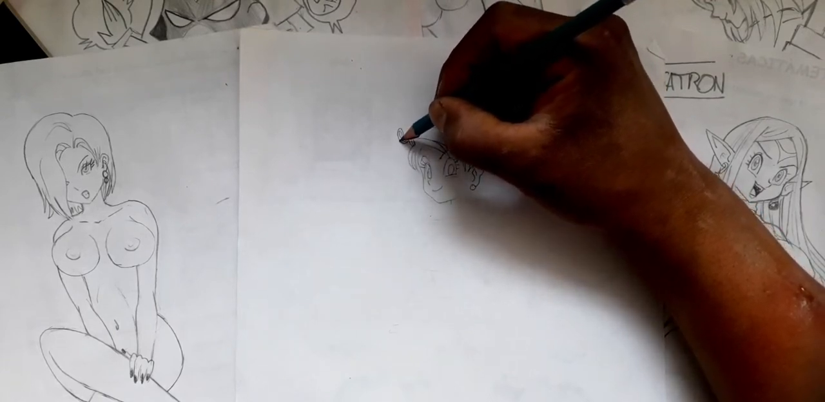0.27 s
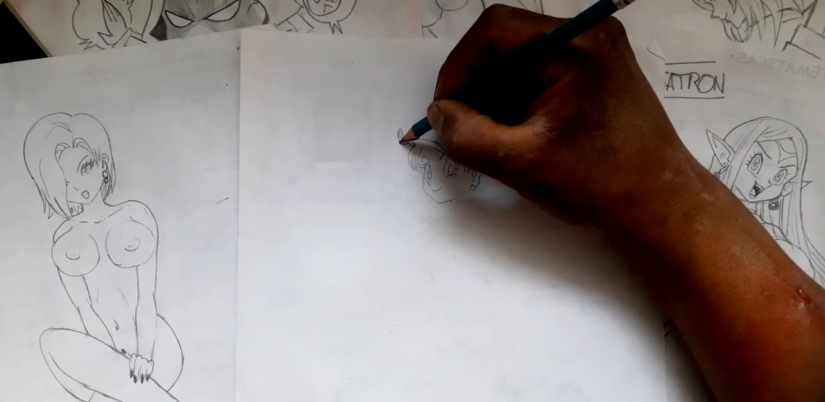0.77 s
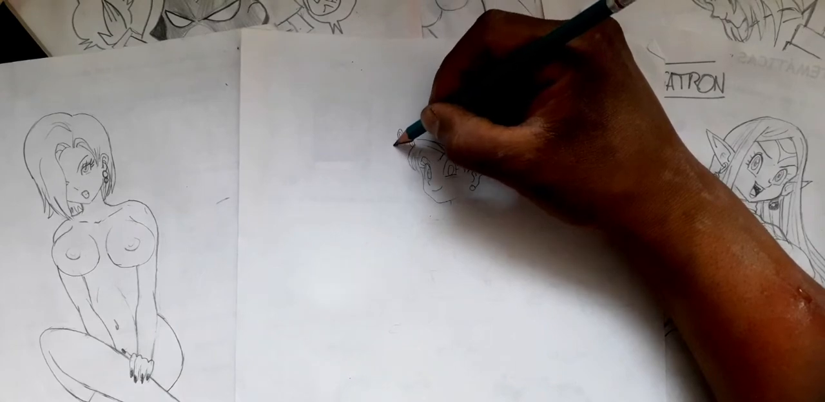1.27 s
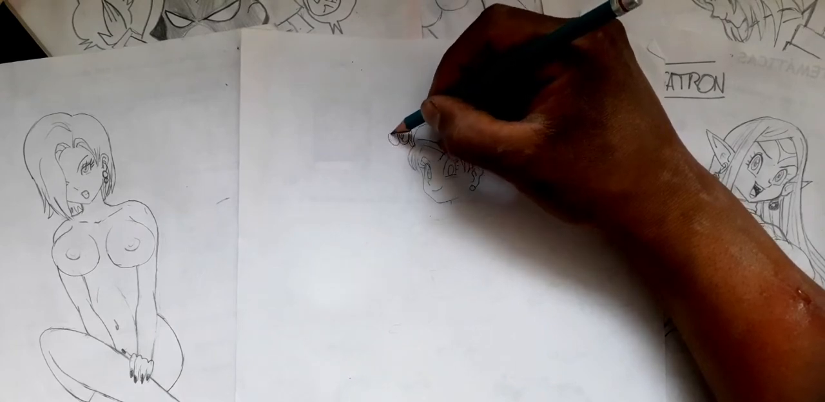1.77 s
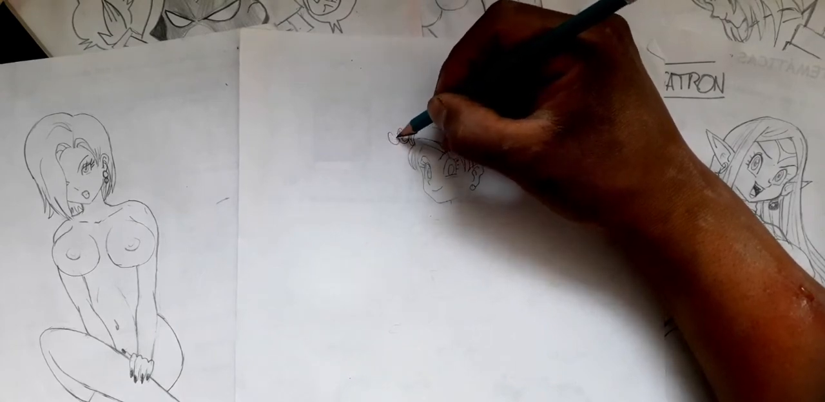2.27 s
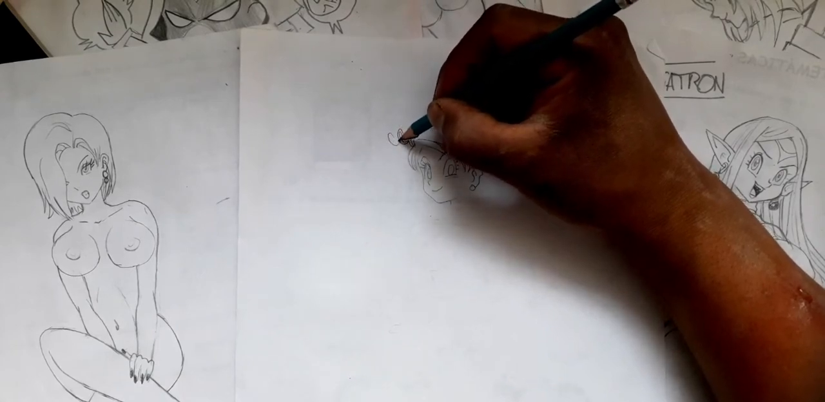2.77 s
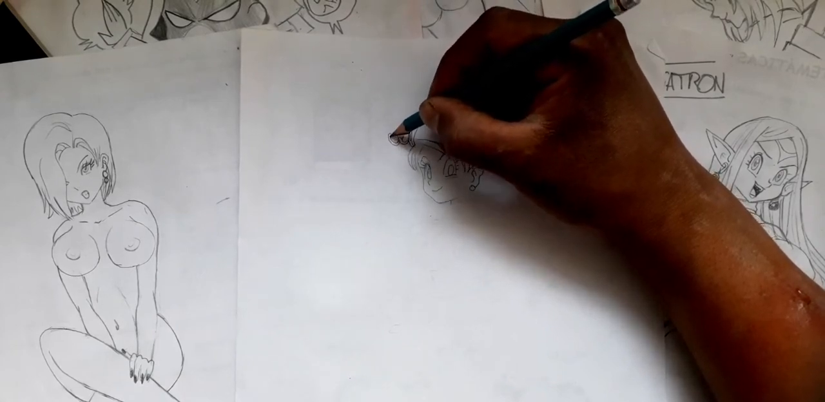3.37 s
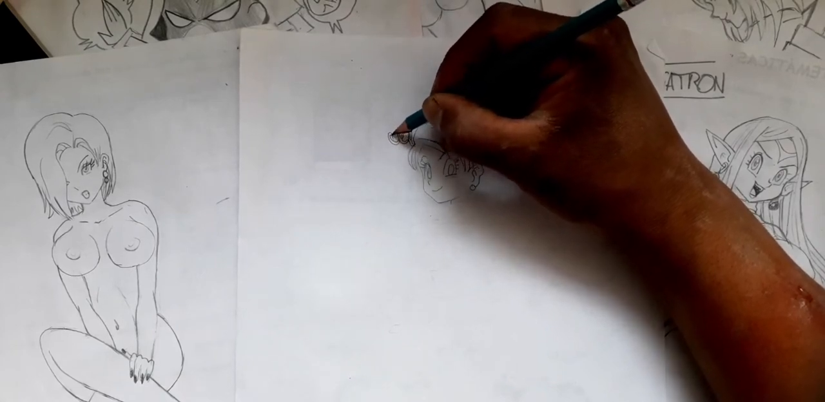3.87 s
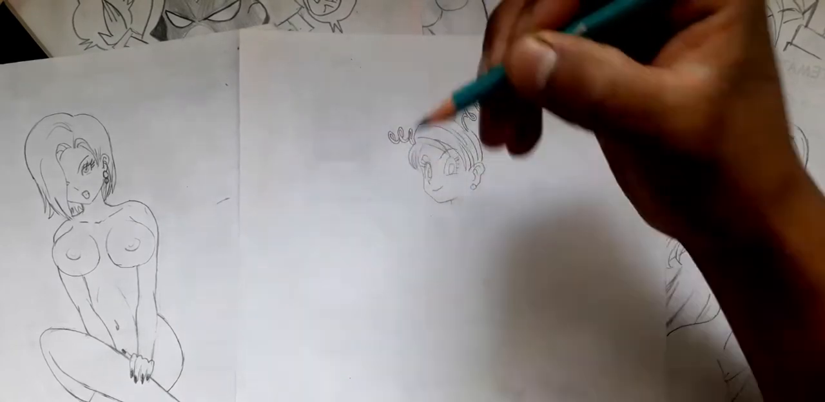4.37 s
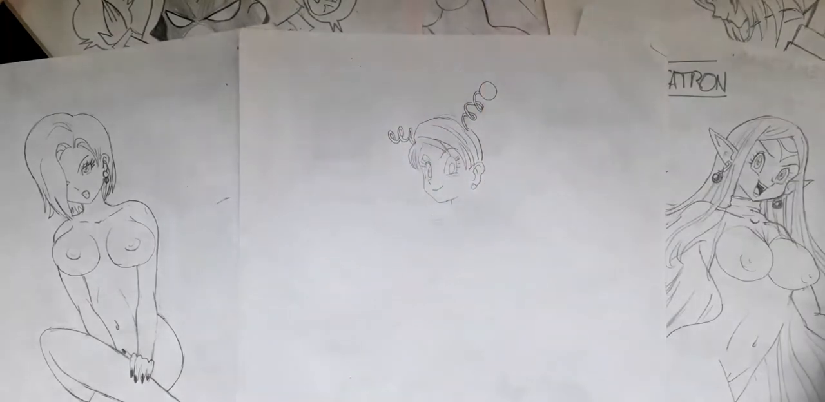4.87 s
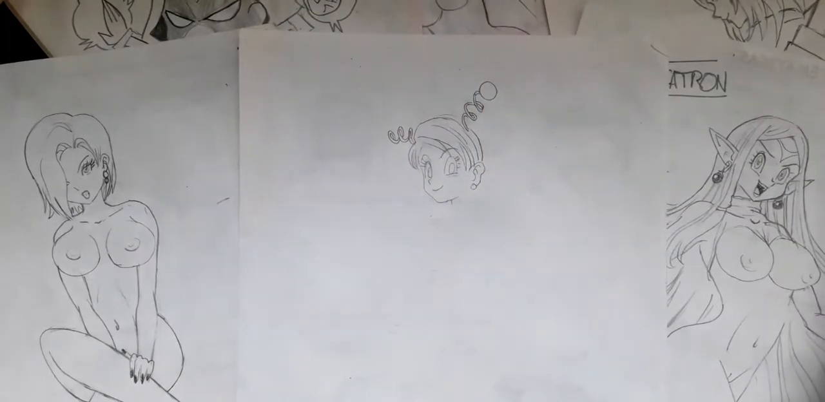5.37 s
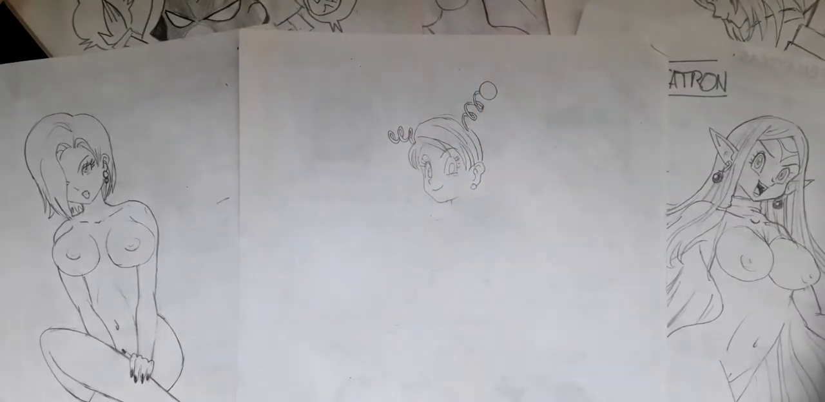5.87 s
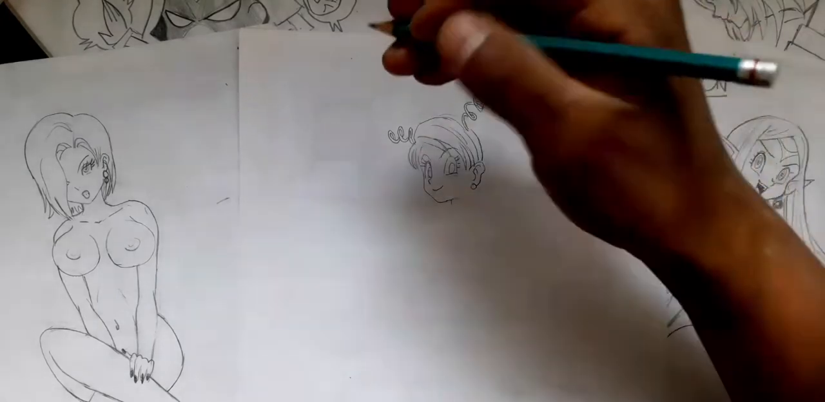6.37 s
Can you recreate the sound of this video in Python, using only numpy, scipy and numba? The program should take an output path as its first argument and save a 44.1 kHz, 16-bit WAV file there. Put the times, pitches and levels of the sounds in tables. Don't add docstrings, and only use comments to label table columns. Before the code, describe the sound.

Quiet sketching over low street rumble and hiss; an engine swells outside as the hand lifts, rustles, returns and knocks the desk.

```python
import sys
import numpy as np
from scipy import signal
from scipy.fft import rfft, irfft
from scipy.io import wavfile
from scipy.ndimage import uniform_filter1d
from numba import njit

SR = 44100
rng = np.random.default_rng(int(sys.argv[2]) if len(sys.argv) > 2 else 0)


def unload_wav(signal):
    wavfile.write(
        sys.argv[1],
        SR,
        np.round(np.clip(np.atleast_2d(signal).T, -1, 1) * 32767).astype(np.int16),
    )


def to_linear_factor(level_db):
    exponent = np.asarray(level_db, float) / 20
    return 10 ** exponent


N = 291809
T = np.arange(N) / SR

# f/Hz, width/Hz, level/dB
ROOM = [(73.5, 9, -6), (89.9, 11.1, 2), (108.6, 14.5, -8), (135.4, 11.8, 1), (157.1, 9.9, -2),
        (181.1, 11.3, -2), (211.6, 12.6, -2), (241, 17, -5), (269.7, 12, -12), (297, 18, -14.5),
        (348, 15, -11.5)]


def level(x, db):
    return x * to_linear_factor(db) / np.sqrt(np.mean(x ** 2))


@njit
def sweep(x, hz, width):
    y, band, low = np.empty(len(x)), 0., 0.
    for i in range(len(x)):
        g, damping = np.tan(np.pi * hz[i] / SR), width / hz[i]
        v = (band + g * (x[i] - low)) / (1 + g * (g + damping))
        band, low, y[i] = 2 * v - band, low + 2 * g * v, damping * v
    return y


def resonance(x, hz, width):
    return sweep(x, np.full(len(x), 1. * hz), 1. * width)


def steep(x, hz, width):
    return resonance(resonance(x, hz, width), hz, width)


def ring(x, modes):
    return sum((-1) ** k * to_linear_factor(db) * resonance(x, hz, width) for k, (hz, width, db) in enumerate(modes))


def walk(rate):
    hold = int(SR / rate)
    steps = np.repeat(rng.standard_normal(N // hold + 1), hold)
    return 0.91 * uniform_filter1d(uniform_filter1d(steps, hold), hold)[:N]


def coloured(points, lo_hz, hi_hz):
    f = np.fft.rfftfreq(N, 1 / SR) + 1e-3
    hz, db = np.transpose(points)
    gain = to_linear_factor(np.interp(np.log(f), np.log(hz), db))
    gain /= np.sqrt(np.sum(gain[(f > lo_hz) & (f < hi_hz)] ** 2) / len(f))
    return irfft(rfft(rng.standard_normal(N)) * gain, N)


def curve(table):
    t, value = np.transpose(table)
    return np.interp(T, t, value)


def swells(rows, signs=1):
    out = np.zeros(N)
    for k, (t, rise, fall, db) in enumerate(rows):
        span = slice(max(int((t - rise) * SR), 0), int((t + fall) * SR))
        u = (T[span] - t) / np.where(T[span] < t, rise, fall)
        out[span] += signs ** k * to_linear_factor(db) * np.abs(np.cos(np.pi / 2 * u)) ** 2.11
    return out


def grit(spread_db, flicker_db, rate):
    slips = rng.standard_normal(N) * to_linear_factor(spread_db * rng.exponential(size=N))
    return slips * to_linear_factor(flicker_db * walk(rate))


def pencil():
    # peak t/s, rise/s, fall/s, scratch level/dB, pad level/dB relative to the scratch
    strokes = [
        (1.242, 0.075, .06, -76, -1),
        (1.34, 0.087, 0.18, -75, -1),
        (1.48, 0.17, 0.19, -72.5, -15),
        (2.9, .14, 0.2, -80, 4),
        (3.04, 0.055, 0.065, -78.5, -2),
        (3.13, 0.07, 0.14, -75, 1),
        (3.24, .12, 0.2, -77, -8),
        (3.641, 0.14, 0.11, -72, -7),
        (4.05, 0.071, 0.071, -65, -8.5),
    ]
    # f/Hz, width/Hz, level/dB
    lead = [(7200, 500, -8), (8150, 600, -3), (8830, 250, -5), (9630, 480, 2), (11550, 450, -3),
            (12450, 400, 0.5), (13200, 400, -6), (14200, 900, -11)]
    t, rise, fall, db, pad_db = np.transpose(strokes)
    press_db = db + 69.5

    def stroke(rel_db):
        return swells(zip(t, rise, fall, db + rel_db))

    slips = grit(2.2, 2.2, 90)
    scratch = level(ring(slips, lead), -1.6)
    scrape = level(steep(grit(2.7, 4.9, 99), hz=9300, width=8000), 0)
    shaft = level(resonance(grit(1.5, 1.2, 60), hz=4960, width=610), -4.5)
    pad = level(steep(slips, hz=913, width=210), -0.24)
    out = stroke(0) * scratch + stroke(-3.5 + 0.72 * press_db) * scrape
    return out + stroke(-2.5 + 0.62 * press_db) * shaft + stroke(pad_db) * pad


def hand():
    # peak t/s, rise/s, fall/s, rub level/dB, lower rub level/dB relative to the rub
    rubs = [(.348, 0.24, 0.2, -70, -5), (.84, 0.11, 0.11, -72.5, -3), (.93, 0.069, 0.16, -77, -1.5),
            (4.26, 0.098, .08, -69, -6), (4.34, .07, 0.046, -60.5, -16), (4.385, 0.033, .09, -66, 0),
            (4.56, 0.16, 0.16, -67, -6.5), (4.65, 0.071, 0.068, -71, -28), (4.76, .12, 0.11, -61.5, -5),
            (4.9, 0.15, 0.27, -65, -3.5), (5.16, .13, 0.23, -67, -4.5), (5.4, 0.23, 0.28, -67.5, -5.5),
            (5.779, 0.21, 0.18, -74, -3), (5.845, .04, 0.037, -70, -19), (6.09, 0.34, 0.13, -66, -8),
            (6.3, 0.3, 0.37, -80, -1.5), (6.54, 0.12, 0.096, -62.5, -7), (6.61, 0.065, .05, -66, 0)]
    # f/Hz, width/Hz, level/dB
    skin = [(6130, 1600, -12.5), (8200, 4400, -3), (11130, 9500, -11.5)]
    # f/Hz, width/Hz, level/dB
    lower_modes = [(2270, 5100, 0), (3130, 270, 7), (3590, 770, 2), (4230, 320, 5.5), (4770, 180, -4),
                   (5970, 740, 0)]
    # peak t/s, rise/s, fall/s, level/dB
    hollow = [
        (4.9, 0.21, 0.24, -71.5),
        (5.92, .1, .15, -82),
    ]
    t, rise, fall, db, lower_db = np.transpose(rubs)
    high = swells(zip(t, rise, fall, db))
    lower = swells(zip(t, rise, fall, db + lower_db))
    slips = grit(1.6, 0.69, 40)

    speed_db = 20 * np.log10(uniform_filter1d(high, SR // 5) / to_linear_factor(-70) + .1)
    brush_s, sag_s = 4.47, 0.58
    brush = (T > brush_s) * np.exp(-np.abs(T - brush_s) / sag_s)
    brush = uniform_filter1d(brush, SR // 20)
    ridge_hz = 8520 + 15 * speed_db + 1340 * brush + 120 * walk(22)
    clearness = 1.5 + swells([(4.91, 0.53, 0.53, 3.5)])
    ridge = clearness * level(sweep(grit(3.4, 3.8, 40), ridge_hz, 650.0), -12)

    weave = level(steep(grit(1.5, 2.5, 30), hz=4320, width=3900), -6)
    dull = level(ring(slips, lower_modes), -3.5) + weave
    palm = level(steep(slips, hz=2290, width=260), -4)
    return high * (level(ring(slips, skin), -3.4) + ridge) + lower * dull + swells(hollow) * palm


def ticks():
    # t/s, peak level/dB, centre f/Hz, T60/s
    paper_ticks = [(0.1364, -70, 14800, 0.02), (0.4576, -67, 3800, 0.02), (4.2425, -54, 8600, 0.02),
                   (4.378, -46, 4160, 0.03), (4.553, -60, 9400, 0.02), (4.643, -52, 7350, 0.019),
                   (5.1286, -53, 8900, 0.02), (5.294, -62, 7600, 0.022), (5.8514, -68, 3130, 0.016),
                   (6.491, -60, 8550, 0.02), (6.5665, -50, 6040, 0.023), (6.5734, -48, 7900, 0.02),
                   (6.587, -42, 7400, 0.013), (6.6094, -34, 7700, 0.075)]
    # t/s, peak level/dB, centre f/Hz, T60/s
    knocks = [
        (4.3777, -51, 1780, 0.11),
        (5.2939, -71, 1380, 0.08),
        (5.6199, -57, 1150, 0.051),
        (5.653, -53, 760, 0.05),
        (6.6094, -40, 900, 0.046),
    ]
    length = 8192
    out, u = np.zeros(N + length), np.arange(length) / SR
    for t, db, hz, t60 in paper_ticks + knocks:
        crack = np.exp(-u / .0007)
        tail = .25 * np.exp(-np.log(1000) * u / max(t60, .005))
        burst = steep(rng.standard_normal(length) * (tail + crack), hz, 0.75 * hz)
        i = int(t * SR)
        out[i:i + length] += to_linear_factor(db) * burst / np.abs(burst).max()
    return out[:N]


def squeaks():
    # peak t/s, rise/s, fall/s, f/Hz, level/dB
    notes_heard = [
        (.385, 0.048, .06, 705, -63.5),
        (.46, 0.071, 0.11, 690, -73),
        (.14, .07, .1, 1037, -81),
        (5.69, .04, 0.078, 1940, -67),
        (5.76, 0.067, .05, 1945, -72),
        (5.875, 0.077, 0.078, 2415, -64),
    ]
    # peak t/s, rise/s, fall/s, f/Hz, level/dB
    creaks = [(0.082, .07, 0.28, 652, -72.5), (2.96, .1, .07, 870, -72), (3.4, 0.084, 0.11, 960, -75),
              (4.8, .12, 0.18, 580, -62.5), (5.33, 0.1, 0.12, 1240, -71.5), (5.95, 0.12, .08, 2450, -77.5),
              (4.77, .08, .12, 4950, -71), (4.9, 0.17, .15, 3700, -75), (4.85, 0.22, .25, 8300, -72),
              (5.35, .2, .2, 4050, -79.5), (5.3, 0.21, .2, 6300, -77), (5.72, .1, 0.12, 8400, -82),
              (6.55, 0.069, 0.068, 3100, -75)]
    waver_hz = 33.6

    def haze(hz, width):
        return level(steep(rng.standard_normal(N), hz, width), 0)

    out = np.zeros(N)
    for t, rise, fall, hz, db in creaks:
        width = 125 * (hz / 1e3) ** .8
        out += swells([(t, rise, fall, db)]) * haze(hz, width)
    for t, rise, fall, hz, db in notes_heard:
        phase = 2 * np.pi * np.cumsum(hz + 0.27 * waver_hz * walk(waver_hz)) / SR
        note = to_linear_factor(2.3 * walk(waver_hz)) * np.sin(phase)
        out += swells([(t, rise, fall, db)]) * (note + to_linear_factor(-5) * haze(hz, 3.6 * waver_hz))
    return out


def room_gain(hz):
    return sum((-1) ** k * to_linear_factor(db) / (1 + 1j * (hz / f - f / hz) * f / width)
               for k, (f, width, db) in enumerate(ROOM))


def engine():
    # t/s, level/dB
    load = [
        (2.2, -29),
        (2.6, -23),
        (3.05, -15.5),
        (3.5, -21.5),
        (4.1, -16.5),
        (4.4, -8),
        (4.8, -6),
        (5.6, -5),
        (6.2, -3),
        (6.62, 1.5),
    ]
    # t/s, f/Hz
    revs = [(2.3, 12.3), (2.9, 12.18), (3.3, 11.9), (3.5, 12.4), (3.8, 12.4), (4.15, 13.2), (4.5, 14.35),
            (4.8, 15.45), (5.1, 16.35), (5.4, 17.3), (5.7, 18.04), (6.0, 18.68), (6.3, 19.3), (6.62, 19.96)]
    # peak t/s, rise/s, fall/s, level/dB
    surges = [(2.52, 0.079, 0.071, -45.5), (2.64, 0.13, 0.11, -42.5), (2.88, 0.21, 0.2, -37),
              (3.08, 0.28, 0.27, -37.5), (3.3, 0.047, 0.13, -41), (3.5, .14, 0.18, -35.5),
              (3.72, 0.059, 0.042, -44), (3.88, 0.26, 0.19, -42), (4.07, 0.21, 0.1, -40.5),
              (4.3, 0.39, 0.22, -45), (4.7, 0.33, 0.3, -45), (4.9, 0.14, 0.33, -46),
              (5.3, 0.12, 0.17, -42.5), (5.57, 0.26, .12, -41), (5.85, 0.24, 0.16, -50.5),
              (6.18, 0.4, 0.48, -36), (6.6, 0.23, .2, -41)]
    # multiple of the cycle rate, level/dB
    orders = [(4, -1.5), (5, -1.5), (6, -10), (8, 0), (9, 0), (10, -5), (11, 3), (12, -1), (13, -0.5),
              (14, -4), (15, -11.5), (16, -3.5), (17, -5), (18, -2.5), (19, -9.5)]
    # f/Hz, width/Hz, level/dB
    roar_bands = [(363, 24, 5), (440.5, 46, 10.5), (539, 18.7, 17), (599, 40, 13), (705, 20.6, 14.5),
                  (783, 33, 11.5), (882, 64, 8)]
    # f/Hz, width/Hz, level/dB
    rasp_bands = [(1006, 66, 0.5), (1267, 107, -6.5), (1453, 160, -9.5)]
    second_firing, second_db = .285, -3
    hz = curve(revs)
    turn = np.cumsum(hz) / SR
    load_db = uniform_filter1d(curve(load), SR // 8)
    near = np.clip((T - load[0][0]) / 0.31, 0, 1)
    clear = np.clip((T - 3.6) / 1.34, .35, 1)

    lines = 0
    for k, db in orders:
        pair = np.angle(1 + to_linear_factor(second_db) * np.exp(-2j * np.pi * k * second_firing))
        answer = np.repeat(room_gain(k * hz[::64]), 64)[:N]
        answer = uniform_filter1d(answer.real, 128) + 1j * uniform_filter1d(answer.imag, 128)
        answer = answer * np.abs(answer) ** .7
        tone = np.real(answer * np.exp(1j * (2 * np.pi * k * turn + pair)))
        lines = lines + to_linear_factor(db + 1.2 * walk(4)) * tone

    blur = level(ring(rng.standard_normal(N), ROOM), -7)
    exhaust = to_linear_factor(-42 + 0.47 * load_db) * (to_linear_factor(1.0) * clear * lines + blur)
    surge = swells(surges) * to_linear_factor(1.6 * walk(21.79))
    boom = np.sqrt(2) * surge * np.cos(2 * np.pi * 7 * turn)
    roar = to_linear_factor(-50 + load_db) * ring(rng.standard_normal(N), roar_bands)
    rasp = to_linear_factor(-57.5 + 2.4 * load_db) * level(ring(rng.standard_normal(N), rasp_bands), -5.0)
    growl = to_linear_factor(0.51 * load_db) * level(steep(rng.standard_normal(N), hz=394, width=160), -66.5)
    puffs = sum(np.exp(-((turn - lag) % 1) / 0.068) for lag in (0, second_firing))
    return near * (exhaust + boom + (roar + rasp + growl) * (0.84 + 0.14 * puffs))


def street():
    # f/Hz, level/dB per Hz
    spectrum = [(15, -64), (25, -31), (48, -17), (90, 7), (112, -4), (134, -3), (218, -11), (240, -15),
                (294, -19.5), (381, -34), (604, -33.5), (768, -39), (3000, -64), (3900, -80), (6600, -120)]
    # peak t/s, level/dB
    rumble = [(.01, -51), (.11, -54), (.3, -54), (.42, -51.5), (.67, -51.5), (.8, -52.5), (.92, -54.5),
              (1.08, -61), (1.26, -53), (1.47, -58.5), (1.65, -50.5), (1.9, -54), (2.069, -53.5),
              (2.22, -50.5), (2.33, -52.5)]
    far = coloured(spectrum, 300, 2500)
    far = 1.06 * (far - resonance(far, hz=80.7, width=22))
    far = far + level(ring(rng.standard_normal(N), ROOM[2:]), 7.4)
    mode = level(np.sin(2 * np.pi * np.cumsum(86.5 + 8.7 * walk(9)) / SR), -0.19)
    traffic_db = -80 + 8.5 * np.exp(-T / 0.024) + 0.33 * walk(0.95)
    swell_s = 0.092
    beat = swells([(t, swell_s, swell_s, db) for t, db in rumble], signs=-0.99)
    return to_linear_factor(traffic_db) * far + beat * mode


def scene():
    close = pencil() + hand() + ticks()
    apart = to_linear_factor(-18.5) * np.roll(close, 180)
    return close + squeaks() + engine() + street() + apart * np.array([[1], [-1]])


def top_cut(x):
    return signal.sosfilt(signal.butter(12, 15810, fs=SR, output="sos"), x)


def record(dry):
    # f/Hz, level/dB per Hz
    shared_hiss = [(880, 4), (1500, -4), (2380, -7.5), (2950, -6), (3770, -6), (6850, -8), (8670, -9),
                   (9370, -9), (15600, -6.5)]
    # f/Hz, level/dB per Hz
    own_hiss = [(88, -56), (150, -21), (189, -8), (239, -25), (285, -10.5), (573, -9.5), (879, -10.5),
                (988, -15), (1320, -10.5), (15600, -5.5)]
    shared = to_linear_factor(-80.5) * coloured(shared_hiss, 3000, 15000)
    own = to_linear_factor(-81) * coloured(own_hiss, 3600, 15000)
    fade = np.clip((T[-1] - T) / .003, 0, 1)
    mix = fade * (dry + shared + own * np.array([[1], [-1]]))
    return top_cut(mix)


dry = scene()
out = record(dry)
unload_wav(out)
```